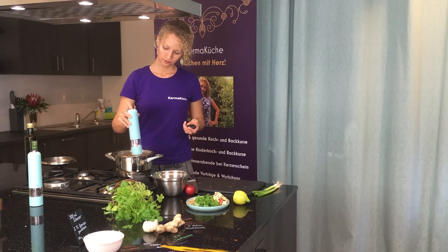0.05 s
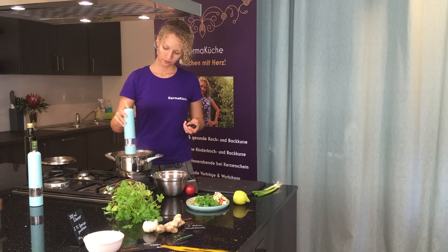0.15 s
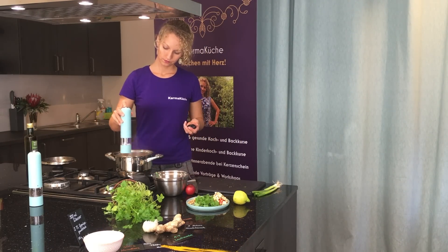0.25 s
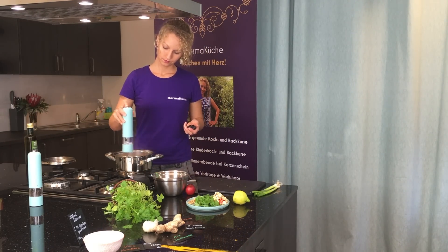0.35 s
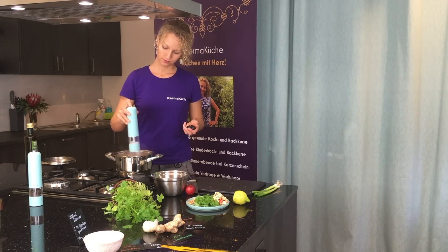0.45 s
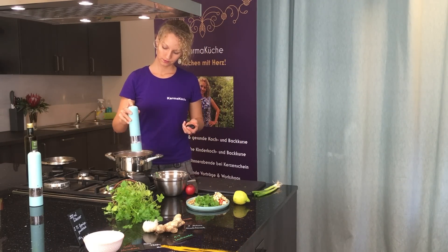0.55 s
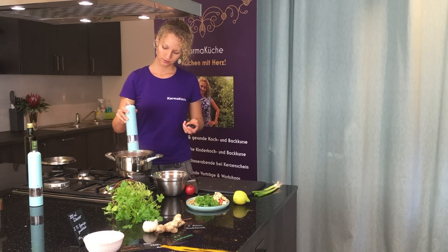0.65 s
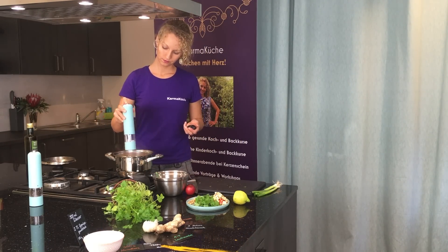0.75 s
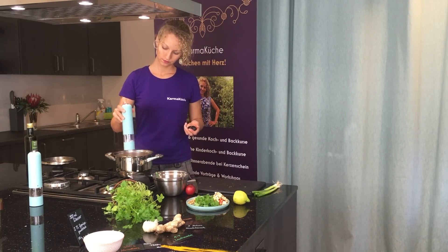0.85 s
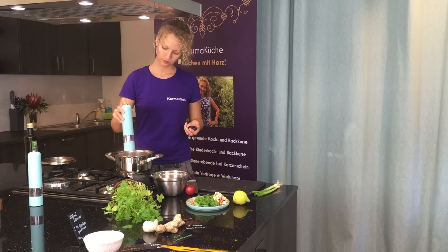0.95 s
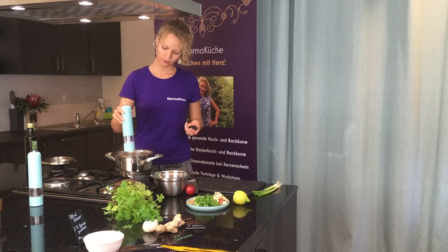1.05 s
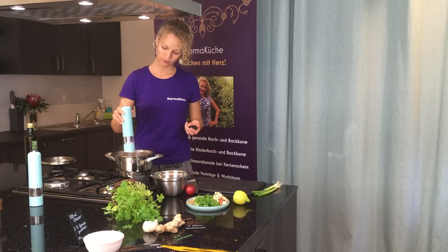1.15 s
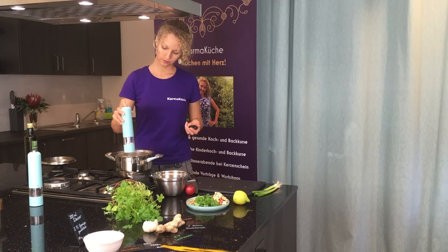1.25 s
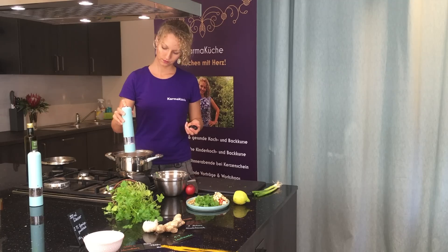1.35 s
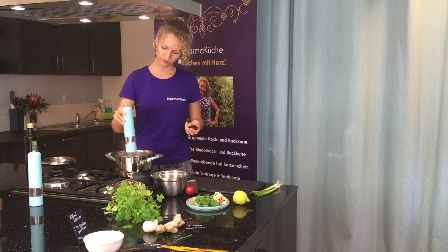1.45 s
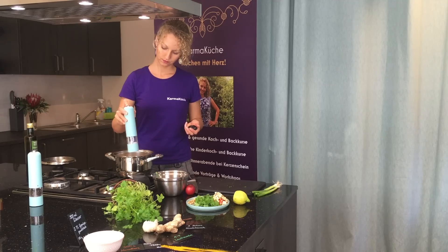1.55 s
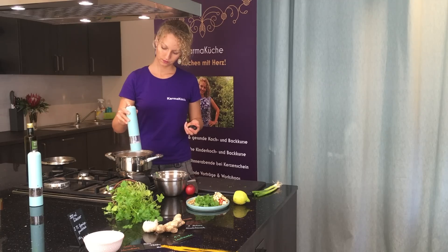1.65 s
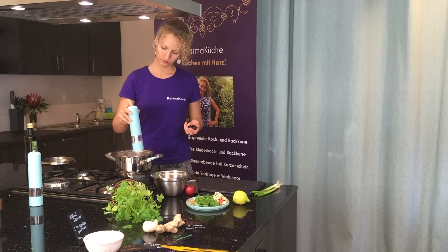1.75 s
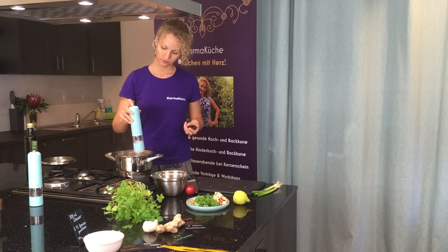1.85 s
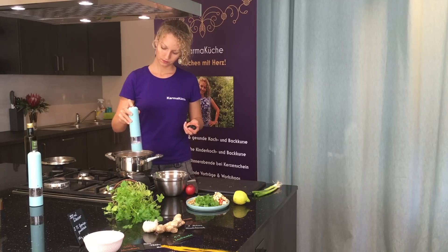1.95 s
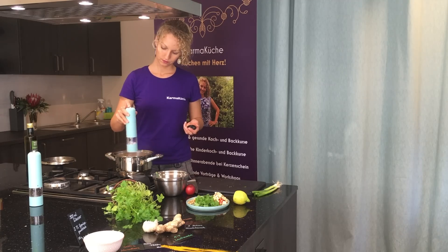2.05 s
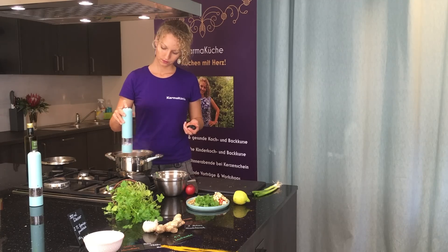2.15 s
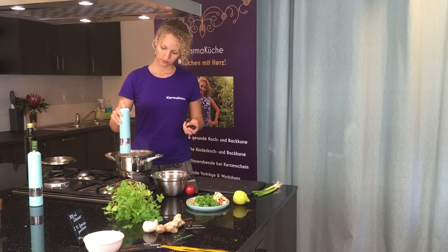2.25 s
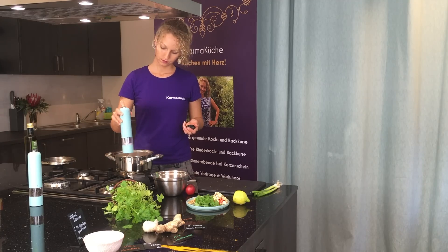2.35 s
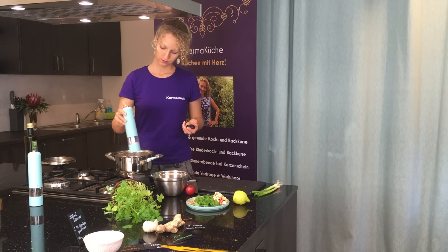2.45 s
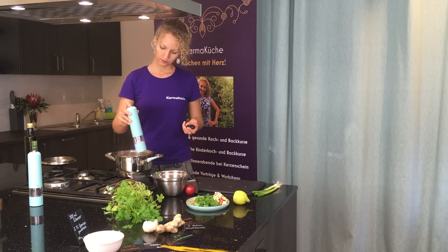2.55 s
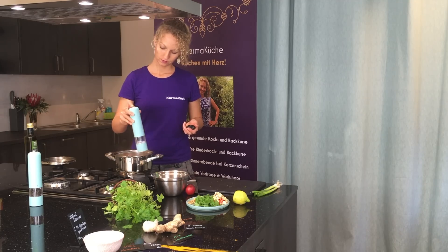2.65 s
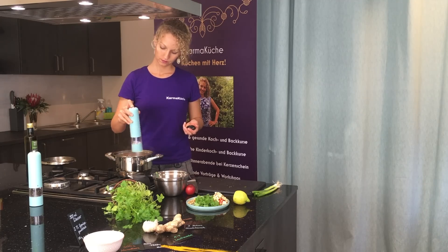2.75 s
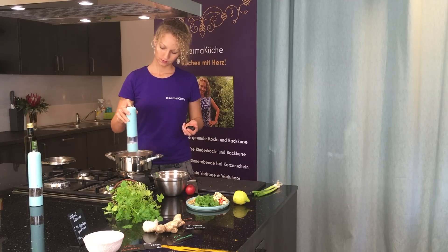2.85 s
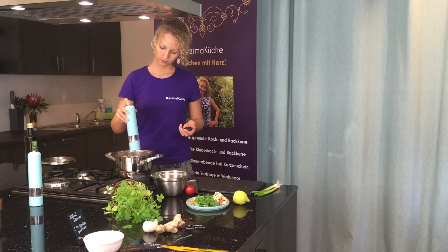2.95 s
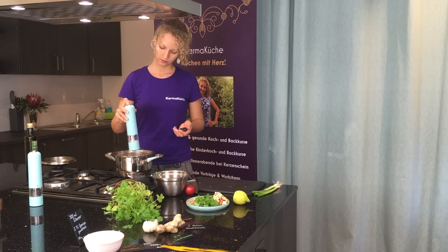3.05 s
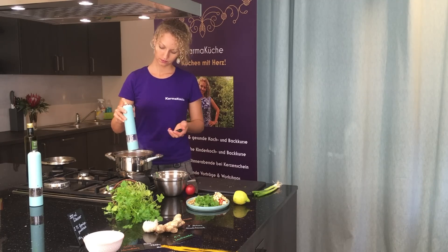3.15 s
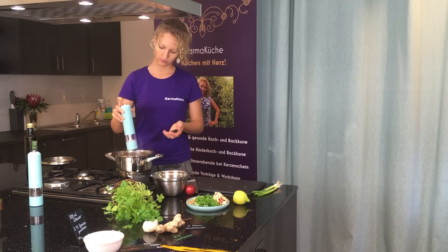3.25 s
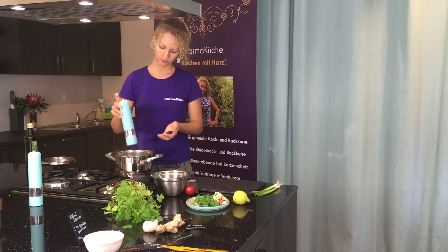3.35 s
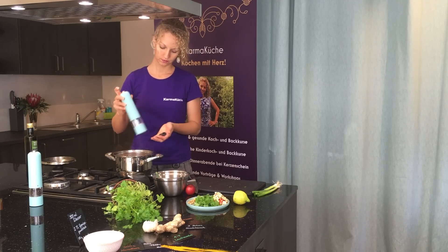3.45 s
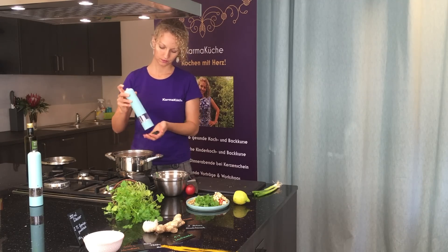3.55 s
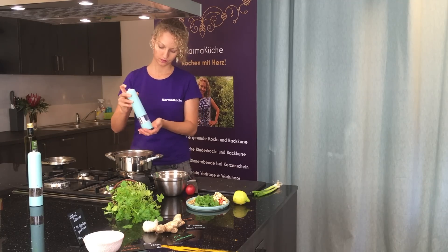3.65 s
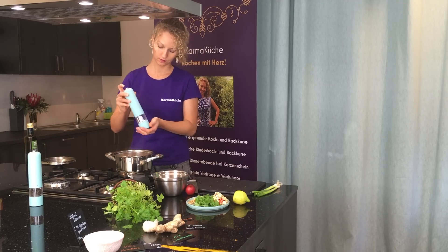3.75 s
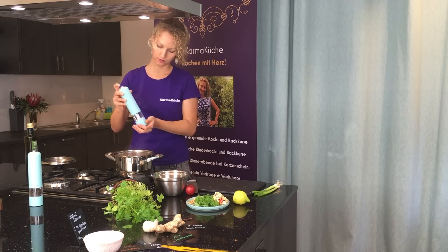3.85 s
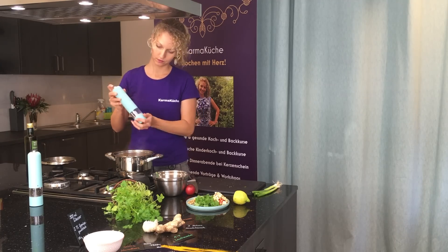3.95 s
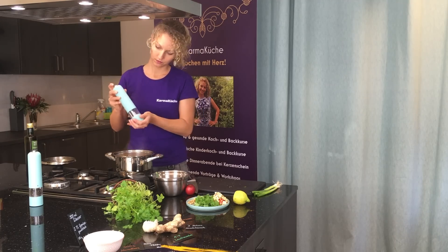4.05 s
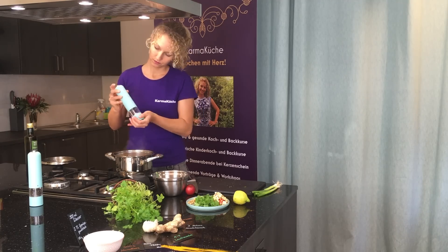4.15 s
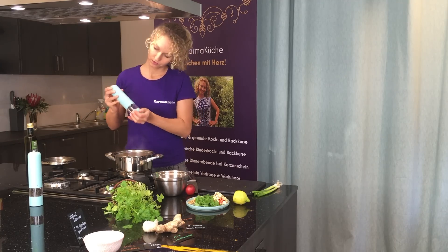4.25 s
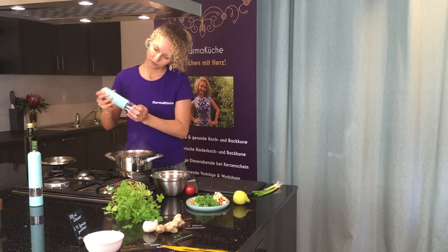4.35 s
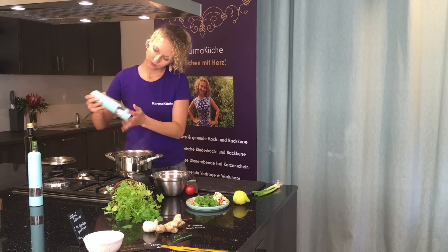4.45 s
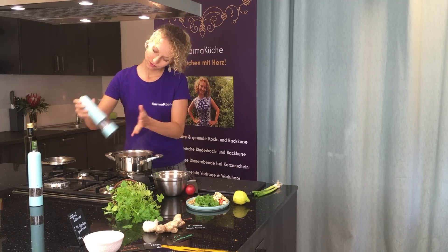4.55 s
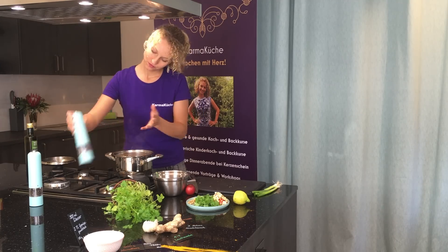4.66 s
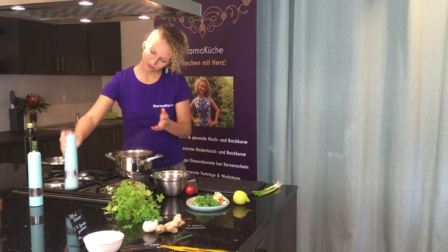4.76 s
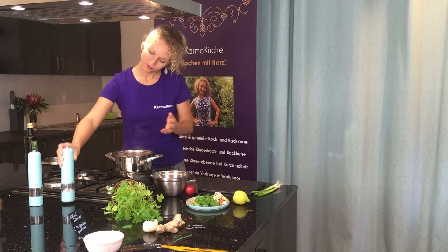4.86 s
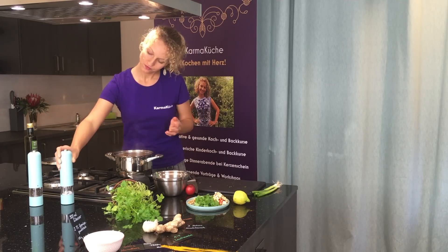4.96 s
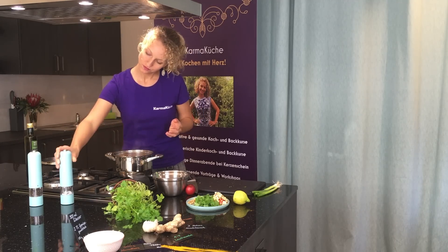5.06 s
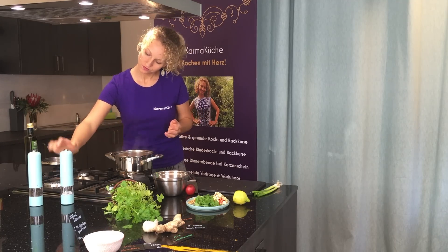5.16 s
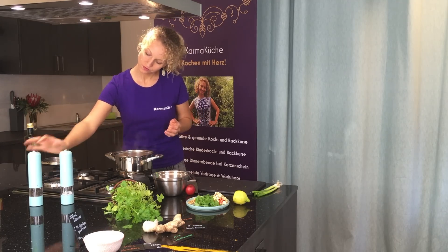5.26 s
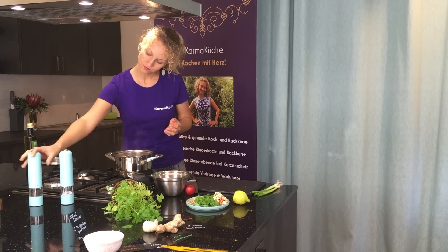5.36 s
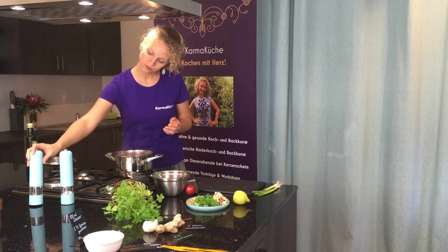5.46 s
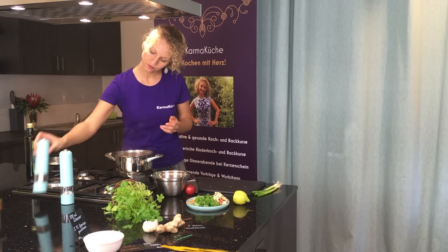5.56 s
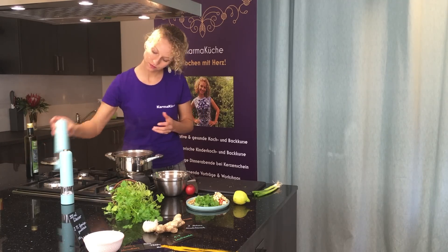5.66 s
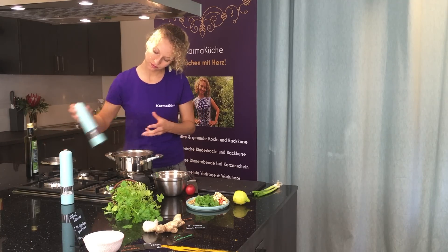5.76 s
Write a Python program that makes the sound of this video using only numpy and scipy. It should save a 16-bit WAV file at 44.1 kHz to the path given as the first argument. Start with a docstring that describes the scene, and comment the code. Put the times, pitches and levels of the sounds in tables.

```python
"""A battery pepper mill grinds over a pot in a live kitchen, with quiet room air and appliance hum.
Its geared motor whines on multiples of the shaft speed, sagging as the burrs bite and crush peppercorns.
The button is let go and the motor runs down; the handled mill snaps, scrapes, clacks and ticks.
It lands on the stone counter, which booms, and rocks to rest; a second mill is knocked as it is lifted.
Blows are short contact bursts coloured by filters; random echo paths give the reverberation."""
import sys
import numpy as np
from scipy import signal
from scipy.fft import rfft, irfft
from scipy.io import wavfile

SR = 44100
rng = np.random.default_rng(int(sys.argv[2]) if len(sys.argv) > 2 else 0)


def dump(signal):
    """Clip the signal to [-1, 1] and save it as 16-bit WAV at the path in sys.argv[1]."""
    limited = np.clip(np.atleast_2d(signal).T, -1, 1)
    pcm = np.round(limited * 32767).astype(np.int16)
    wavfile.write(sys.argv[1], SR, pcm)


N = 256220
T = np.arange(N) / SR

# Gear tones. Each row: multiple of the shaft speed, relative level in dB.
GEAR_TONES = [(1, -30.5), (3, -16.5), (4, -19), (6, -24.5), (7, -8), (8, -13), (9, -19), (10, -15),
              (11, -4.5), (12, -16.5), (15, -23), (22, -19), (34, -14)]
# Burrs braking on a peppercorn. Each row: start in s, length in s, full sag of the shaft speed in Hz.
BURR_BITES = [(-.1, .125, 16), (.11, .1, 12), (0.241, .33, 9.5), (.573, .1, 21), (.859, .17, 22),
              (1.037, .071, 47), (1.107, .156, 16), (1.342, .135, 27), (1.569, .146, 37), (1.844, .205, 17),
              (2.524, .088, 30), (2.801, .097, 22), (3.188, .105, 45)]
# Burrs running empty. Each row: start in s, length in s.
EMPTY_RUNS = [(2.36, .16), (3.034, .15)]
# Peppercorns cracking. Each row: time in s, level in dB.
CORN_CRACKS = [(.175, -21), (.633, -17), (.655, -27), (.781, -20), (.996, -20), (1.645, -17.5), (1.66, -29),
               (2.504, -17), (2.58, -16.5), (2.81, -18), (2.858, -23.5)]
# Dull jolts as a corn jams or the motor stops. Each row: time in s, level in dB, chatter decay in s.
DRIVE_JOLTS = [(.635, -26.5, 0.019), (1.65, -30, 0.024), (3.245, -30, 0.022)]
# Plastic parts snapping. Each row: time in s, level in dB, chatter decay in s.
PART_SNAPS = [(3.6948, -24.5, 0.0085), (3.7048, -10.5, 0.0035)]
# The grind setting clacking home. Each row: time in s, level in dB, chatter decay in s.
SETTING_CLACKS = [(4.0815, -12, 0.0058), (4.117, -22.5, 0.0032)]
# Fingers ticking on the housing. Each row: time in s, level in dB, chatter decay in s.
FINGER_TICKS = [(4.2705, -43, .001), (4.5167, -35, 0.0017), (4.8, -52, .01)]
# Base edges landing on the stone. Each row: time in s, level in dB, chatter decay in s.
BASE_THUMPS = [(4.9515, -12.3, 0.0024), (4.9555, -13.5, 0.0027)]
# Light knocks of the second mill as it is lifted. Each row: time in s, level in dB, chatter decay in s.
LIFT_KNOCKS = [(5.3878, -29, 0.0052), (5.4561, -32.5, 0.0056)]
# Weight coming onto or off the counter. Each row: time in s, level in dB.
COUNTER_LOADS = [(4.952, -27.5), (5.005, -26.5), (5.36, -53)]

# Colour of grinding and cracks. Each row: frequency in Hz, relative level in dB.
GRIND_COLOUR = [(120, -41), (200, -22), (372, -25.5), (610, -10), (946, -8.5), (1390, -2), (1900, -4.5),
                (2450, -4), (3000, -4.5), (3800, -9), (6600, -6.5), (7900, -12), (9640, -8), (15800, -14.5)]
# Colour of the drive jolts. Each row: frequency in Hz, relative level in dB.
JOLT_COLOUR = [(80, -26), (200, -9), (350, -11.5), (550, 6), (800, 6), (1500, -5), (4000, -38),
               (15000, -54)]
# Colour of snaps and the finger rub. Each row: frequency in Hz, relative level in dB.
SNAP_COLOUR = [(100, -30), (300, -9), (800, -9), (1600, -2), (2500, -4), (3150, 1.5), (4400, -4),
               (5100, -9), (6150, 1.5), (7400, -7.5), (10000, -1), (12000, -10), (14000, -1), (14600, -9)]
# Colour of the twist scrape. Each row: frequency in Hz, relative level in dB.
TWIST_COLOUR = [(250, -32.5), (600, -22), (860, -19), (1080, 5), (1280, -5), (1550, -13), (1850, -7),
                (2400, -22), (3500, -18), (5200, -31.5), (15000, -37)]
# Colour of the clacks. Each row: frequency in Hz, relative level in dB.
CLACK_COLOUR = [(100, -24), (250, -13.5), (600, -8.5), (840, -12.5), (1080, 7.5), (1300, 0.5), (1600, -7),
                (2400, -15.5), (3500, -11), (4400, -13.5), (5200, -19.5), (6100, -16.5), (7500, -25.5),
                (15000, -25)]
# Colour of the ticks. Each row: frequency in Hz, relative level in dB.
TICK_COLOUR = [(400, -10), (1500, -18), (3300, -17), (4200, 1), (4700, -3), (5600, -11), (7500, -11),
               (9500, -5), (15000, -13.5)]
# Colour of landing and rocking. Each row: frequency in Hz, relative level in dB.
THUMP_COLOUR = [(35, -33), (75, -4), (160, -10.5), (230, -2.5), (290, -1), (420, -8), (550, -20.5),
                (900, -13), (1250, -6), (1550, -22), (1900, -30.5), (3100, -27.5), (5000, -36), (5900, -28),
                (8000, -39), (15800, -38)]
# Colour of the lift knocks. Each row: frequency in Hz, relative level in dB.
LIFT_COLOUR = [(60, 13), (240, 16), (340, 7), (900, -1), (1300, 8), (1800, -7.5), (3200, -7), (4800, -11.5),
               (6400, -3), (15800, -6.5)]
# Housing resonances. Each row: frequency in Hz, width in Hz, lift in dB.
HOUSING_MODES = [(1106, 59, 0), (1300, 80, -1.5), (1510, 98, 2.5), (2140, 170, 4), (3003, 530, 4),
                 (4450, 280, 3), (6000, 360, 0.5), (7200, 880, -2), (10600, 660, -3)]
# Ringing of the slab and cabinet. Each row: frequency in Hz, relative level in dB, t60 in s.
COUNTER_MODES = [(73.2, -12.5, 0.97), (92.5, -15, 0.54), (125.5, -12, 0.45), (166, -10, 0.35),
                 (214, -10, .6), (242, -7, 0.62), (272.5, -2, 0.57), (317, -12.5, 0.33), (418, -12.5, 0.49),
                 (695, -16, 0.31)]
# Kitchen reverberation. Each row: frequency in Hz, t60 in s.
KITCHEN_T60 = [(80, 1), (250, 0.65), (500, 0.54), (1200, 0.7), (3000, 0.64), (7000, 0.57), (15000, 0.4)]
# Appliance hum. Each row: frequency in Hz, rms level in dB before wavering.
HUM_TONES = [(48.5, -68), (97.5, -63), (165, -78)]
# Colour of the room air. Each row: frequency in Hz, relative level in dB.
AIR_COLOUR = [(20, -25), (48, -8), (65, -6), (150, -12), (300, -8), (700, -16), (2000, -23), (6000, -27),
              (15800, -26)]

SHAFT_HZ, RACE_HZ = 203.6, 11.5  # speed on fine grit; full gain with empty burrs
INERTIA_S = 0.04  # time constant of the speed after a change of load
STOP_S, COAST_S = 3.26, 0.033  # button let go; time constant of the drive strength
# Drive strength at the start without sag; growth with sag; growth with time.
DRIVE_DB, LOAD_DB_PER_HZ, SWELL_DB_PER_S = -34.7, 0.0088, 0.2
# Fingers slide on the housing as they take hold, then one twist of the grind setting.
RUB_S, RUB_RISE_S, RUB_HOLD_S, RUB_FALL_S, RUB_DB = 3.897, 0.025, 0.011, 0.012, -39.5
TWIST_S, TWIST_RISE_S, TWIST_HOLD_S, TWIST_FALL_S, TWIST_DB = 3.918, 0.022, 0.033, 0.037, -33.5
# Even, weakening knocks as the mill rocks to rest.
ROCK_S, ROCK_GAP_S, ROCK_DB, ROCK_LOSS_DB, ROCK_CHATTER_S = 4.99, 0.017, -22.5, 0.8, 0.0028
EDGE_HZ = 15850  # recorder's band limit


def drive():
    """Shaft angle and drive strength: speed sags at bites, races when empty, runs down after the stop."""
    sag_hz = sum(hz * lagged(start_s, length_s) for start_s, length_s, hz in BURR_BITES)
    sag_hz = sag_hz - RACE_HZ * sum(lagged(*row) for row in EMPTY_RUNS)
    coast = np.exp(-np.maximum(T - STOP_S, 0) / COAST_S)
    speed_hz = (SHAFT_HZ - sag_hz) * (1 + 0.003 * wander(40)) * np.sqrt(coast)
    angle = 2 * np.pi * np.cumsum(speed_hz) / SR
    strength = amp(DRIVE_DB + LOAD_DB_PER_HZ * sag_hz + SWELL_DB_PER_S * T) * coast
    return angle, strength


def lagged(start_s, length_s):
    """Share of a passing load that the motor's speed has taken up, through its inertia."""
    before_on = np.exp(-np.maximum(T - start_s, 0) / INERTIA_S)
    before_off = np.exp(-np.maximum(T - start_s - length_s, 0) / INERTIA_S)
    return before_off - before_on


def gears(angle, strength, whine_db=-1.8, flutter=0.27):
    """Gear tones on multiples of the shaft speed; uneven tooth load makes each flutter."""
    tones = np.zeros(N)
    for multiple, db in GEAR_TONES:
        tone = np.sin(round(multiple) * angle + 2 * np.pi * rng.random())
        tones += amp(db) * (1 + flutter * wander(20)) * tone
    return amp(whine_db) * strength * tones


def burrs(angle, strength, rattle_db=-4, crunch_db=-3, bite=0.71, clump_db=3):
    """Drive rattle swelling once a turn, crushed grains, cracks and jolts, all through the housing."""
    rattle = unit(rng.standard_normal(N) * np.exp(bite * np.cos(angle)))
    crunch = unit(grains(per_s=2500, spread_db=3) * amp(clump_db * wander(70)))
    cracks = contacts([(s, db, 0.003) for s, db in CORN_CRACKS], chatter=2.8)
    force = strength * (amp(rattle_db) * rattle + amp(crunch_db) * crunch) + cracks
    jolts = colour(contacts(DRIVE_JOLTS, chatter=4.1), JOLT_COLOUR, HOUSING_MODES)
    return colour(force, GRIND_COLOUR, HOUSING_MODES) + jolts


def handling():
    """Plastic parts snap, fingers rub and tick, the grind setting scrapes round and clacks home."""
    rub = amp(RUB_DB) * slide(RUB_S, RUB_RISE_S, RUB_HOLD_S, RUB_FALL_S)
    twist = amp(TWIST_DB) * slide(TWIST_S, TWIST_RISE_S, TWIST_HOLD_S, TWIST_FALL_S)
    snaps = colour(contacts(PART_SNAPS, chatter=3.6) + rub, SNAP_COLOUR, HOUSING_MODES)
    scrape = colour(twist, TWIST_COLOUR, HOUSING_MODES)
    clacks = colour(contacts(SETTING_CLACKS, chatter=3.1), CLACK_COLOUR, HOUSING_MODES)
    ticks = colour(contacts(FINGER_TICKS, chatter=1.8), TICK_COLOUR, HOUSING_MODES)
    return snaps + scrape + clacks + ticks


def slide(start_s, rise_s, hold_s, fall_s):
    """Equal tiny slips under one stroke that swells, holds and dies away."""
    t = T - start_s
    swell = np.clip(t / rise_s, 0, 1) ** 2
    decay = np.exp(-np.maximum(t - rise_s - hold_s, 0) / fall_s)
    return grains(per_s=2000, spread_db=0) * swell * decay


def knocks(count=3):
    """The mill lands on the stone and rocks to rest; its twin is knocked lightly as it is lifted."""
    rocking = [(ROCK_S + k * ROCK_GAP_S, ROCK_DB - k * ROCK_LOSS_DB, ROCK_CHATTER_S) for k in range(count)]
    landing = contacts(list(BASE_THUMPS) + rocking, chatter=0.69)
    lifting = contacts(LIFT_KNOCKS, chatter=1.55)
    return colour(landing, THUMP_COLOUR, HOUSING_MODES) + colour(lifting, LIFT_COLOUR, HOUSING_MODES)


def counter(rise_s=0.002):
    """Each change of load sets the slab and cabinet modes ringing, as decaying sines."""
    boom = np.zeros(N)
    for s, load_db in COUNTER_LOADS:
        part = boom[round(s * SR):]  # a view: adding to it fills boom
        t = T[:len(part)]
        ring = sum(amp(db - 60 * t / t60) * np.sin(2 * np.pi * hz * t) for hz, db, t60 in COUNTER_MODES)
        part += amp(load_db) * ring * (1 - np.exp(-t / rise_s))
    return boom


def kitchen(x, wet_db, shift_hz, count=4):
    """Direct sound plus echoes; the mill's sound keeps shifting between sets of echo paths."""
    shares = np.array([wander(shift_hz) for _ in range(count)])
    shares /= np.linalg.norm(shares, axis=0)
    # a mirrored second ahead fills the room before the start
    feeds = np.pad(x * shares, ((0, 0), (SR, 0)), "reflect")
    wet = sum(signal.fftconvolve(feed, reflections())[SR:SR + N] for feed in feeds)
    return (x + amp(wet_db) * wet) / np.hypot(1, amp(wet_db))


def reflections(build_s=0.0018):
    """One set of echo paths: random taps that thicken quickly, each band dying at its own speed."""
    taps = rng.choice([-1., 1.], SR) * (rng.random(SR) < 5000 / SR)
    hz, t, bands = signal.stft(taps, SR, nperseg=256)
    decay = amp(-60 * t / read(KITCHEN_T60, hz)[:, None])
    tail = signal.istft(bands * decay, SR, nperseg=256)[1][:SR]
    tail *= 1 - np.exp(-T[:SR] / build_s)
    return tail / np.linalg.norm(tail)


def background(air_db=-61, waver=0.21):
    """Room air as coloured noise, and appliance hum as sines of wavering level."""
    hum = np.zeros(N)
    for hz, db in HUM_TONES:
        level = amp(db) * (1 + waver * wander(3.5))
        hum += level * np.sqrt(2) * np.sin(2 * np.pi * (hz * T + rng.random()))
    return hum + amp(air_db) * colour(rng.standard_normal(N), AIR_COLOUR)


def contacts(rows, chatter):
    """Sharp pushes, each with dying noise chatter; dB is the level spread over a millisecond."""
    force, t = np.zeros(N), T[:SR // 4]
    for s, db, decay_s in rows:
        noise = unit(rng.standard_normal(len(t)) * np.exp(-t / decay_s))
        spectrum = rfft(unit(t == 0) + chatter * noise)
        # a hard contact excites all frequencies alike: keep only the phase
        burst = irfft(spectrum / (abs(spectrum) + 1e-12))[:len(t) // 2]
        burst *= amp(db) * np.sqrt(SR / 1000) / np.linalg.norm(burst)
        part = force[round(s * SR):][:len(burst)]
        part += burst[:len(part)]
    return force


def grains(per_s, spread_db):
    """Tiny fractures as random impulses, overall rms 1; a spread makes a few of them large."""
    size = amp(spread_db * np.minimum(rng.exponential(1, N), 4))
    return unit(size * rng.choice([-1, 1], N) * (rng.random(N) < per_s / SR))


def colour(x, spectrum, modes=(), size=8192):
    """Minimum-phase filter of energy 1: a smooth spectrum with ringing resonances on top."""
    hz = abs(np.fft.fftfreq(size, 1 / SR))
    lifts_db = sum(lift / (1 + (2 * (hz - f) / width) ** 2) for f, width, lift in modes)
    log_gain = np.log(amp(read(spectrum, hz) + lifts_db))
    response = np.fft.ifft(np.exp(np.conj(signal.hilbert(log_gain)))).real[:size // 2]
    return signal.oaconvolve(x, response / np.linalg.norm(response))[:N]


def wander(rate_hz):
    """Random drift of rms 1: noise rolled off above the given rate."""
    hz = np.fft.rfftfreq(N, 1 / SR)
    return unit(irfft(rfft(rng.standard_normal(N)) / np.sqrt(1 + (hz / rate_hz) ** 4), N))


def read(points, hz):
    """Interpolates (Hz, value) rows on a log-frequency axis."""
    f, value = np.transpose(points)
    return np.interp(np.log(hz + 1), np.log(f + 1), value)


def amp(db):
    """Decibels to gain."""
    return 10 ** (np.asarray(db) / 20)


def unit(x):
    """Scales to rms 1."""
    return x / np.sqrt(np.mean(x ** 2) + 1e-20)


def scene():
    """Sums all sources at one microphone, into two equal channels."""
    angle, strength = drive()
    whine = kitchen(gears(angle, strength), wet_db=0.5, shift_hz=2.15)
    grinding = kitchen(burrs(angle, strength), wet_db=4, shift_hz=24.7)
    blows = kitchen(handling() + knocks(), wet_db=2, shift_hz=30)
    mono = whine + grinding + blows + counter() + background()
    return np.array([mono, mono])


def record(dry):
    """The microphone's bass roll-off, then the recorder's band limit."""
    bass_cut = signal.butter(4, 40, "highpass", fs=SR, output="sos")
    band_limit = signal.firwin(511, EDGE_HZ, window=("kaiser", 9), fs=SR)
    return signal.oaconvolve(signal.sosfilt(bass_cut, dry), band_limit[None], "same")


dry = scene()
out = record(dry)
dump(out)
```